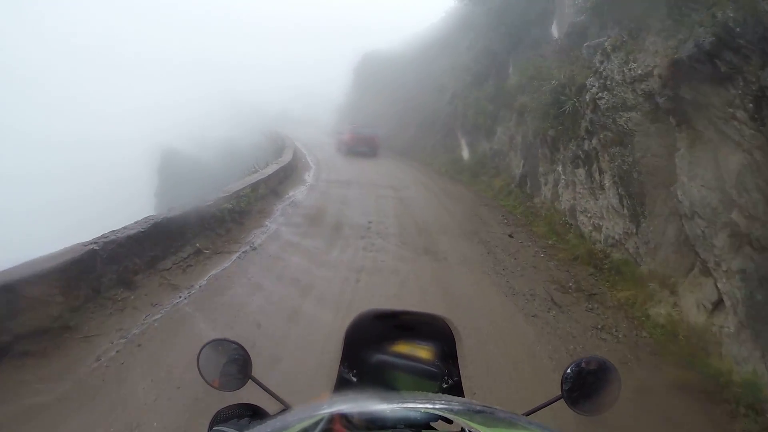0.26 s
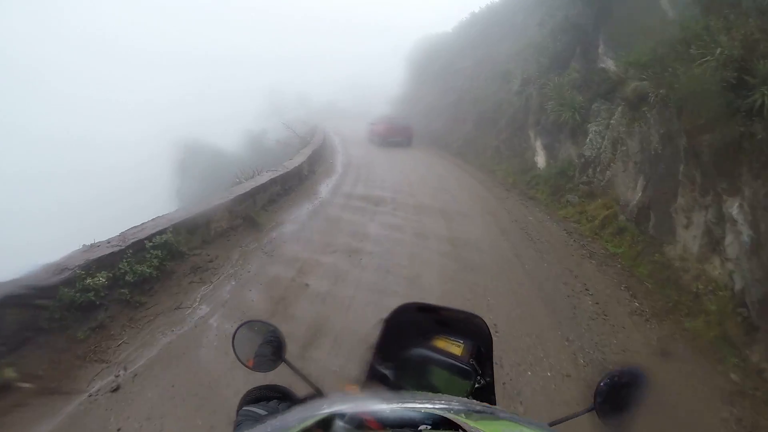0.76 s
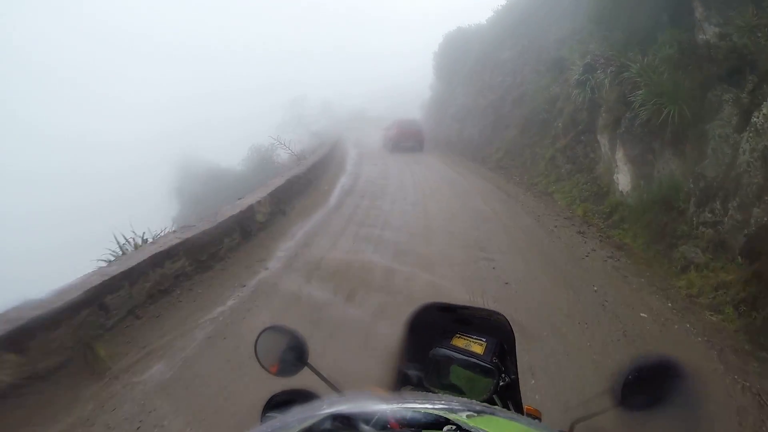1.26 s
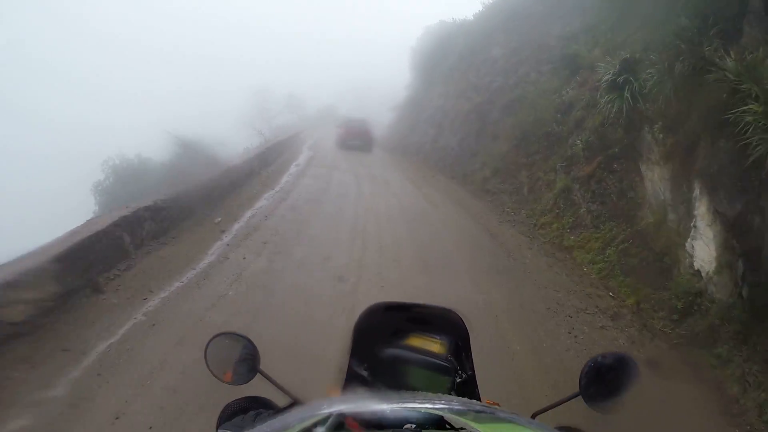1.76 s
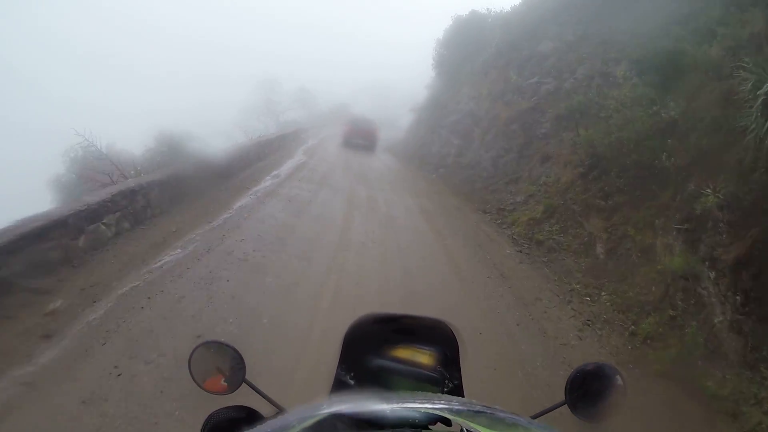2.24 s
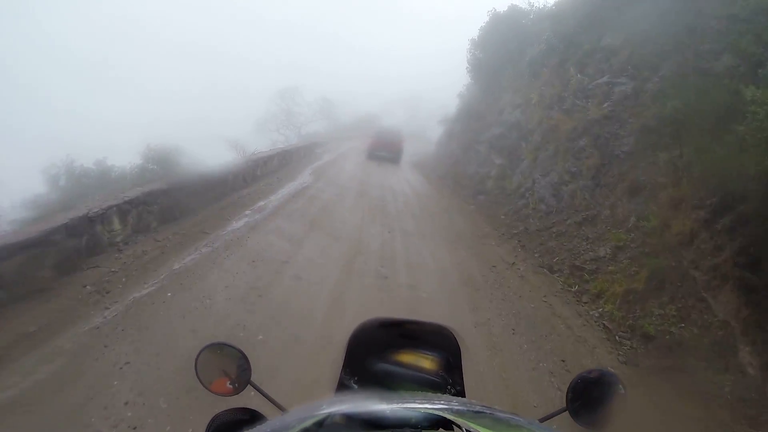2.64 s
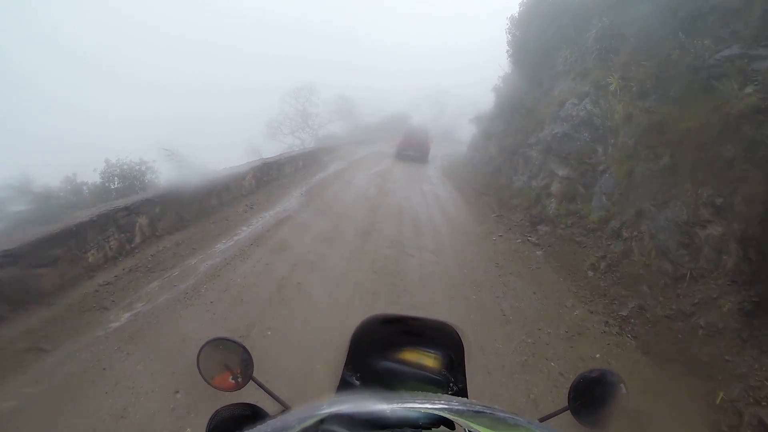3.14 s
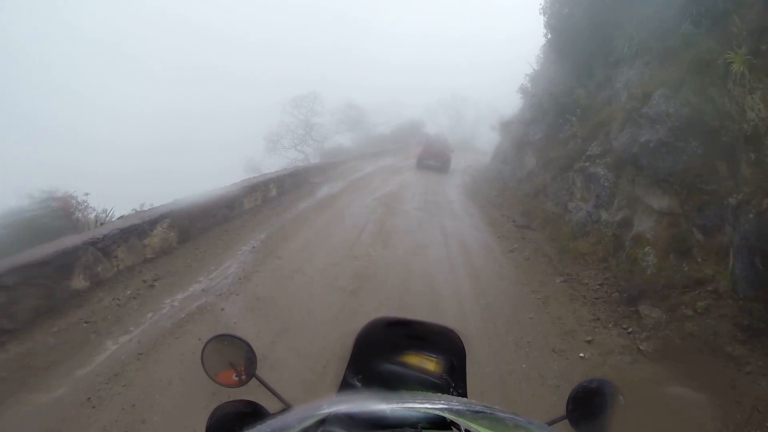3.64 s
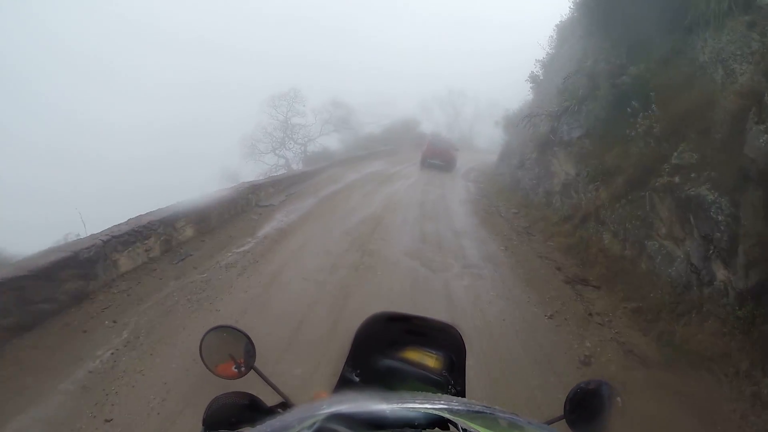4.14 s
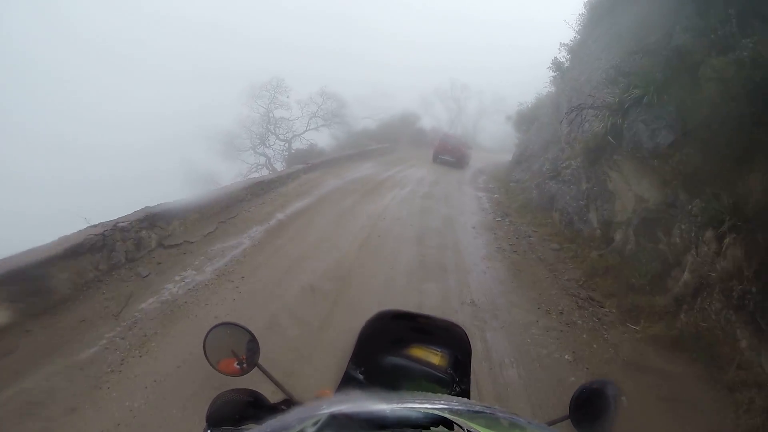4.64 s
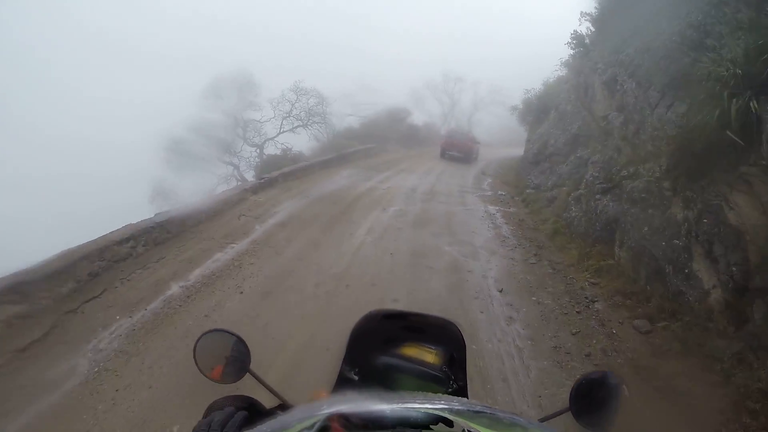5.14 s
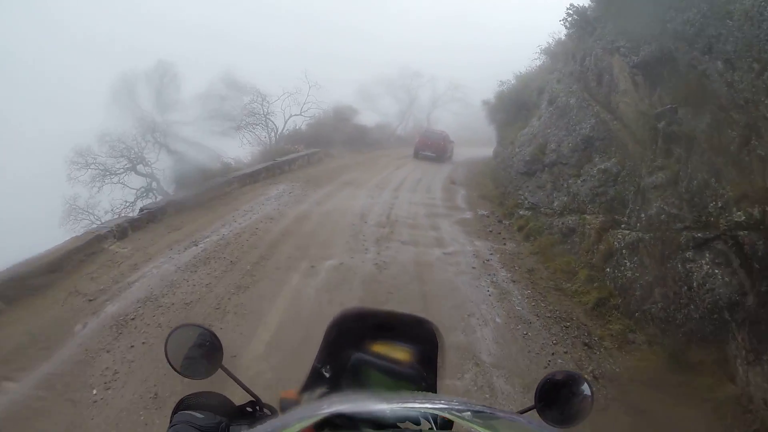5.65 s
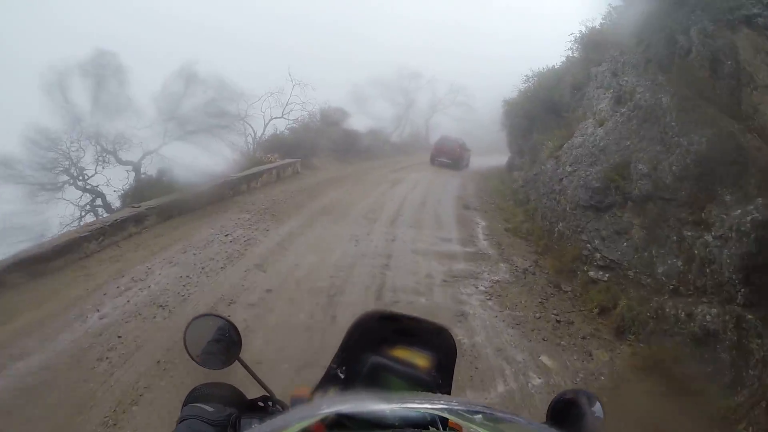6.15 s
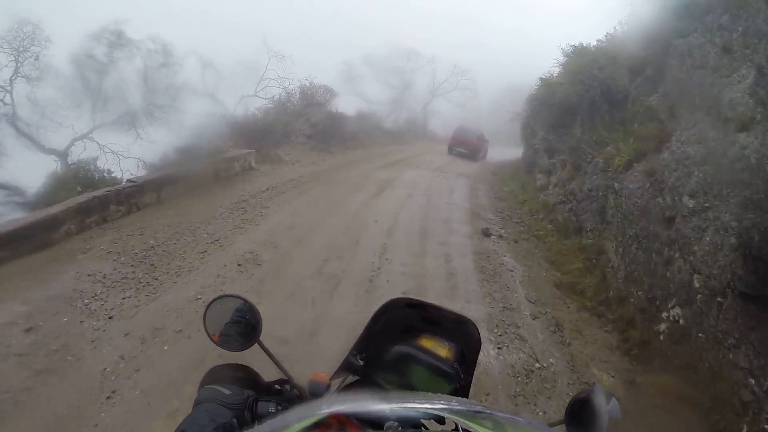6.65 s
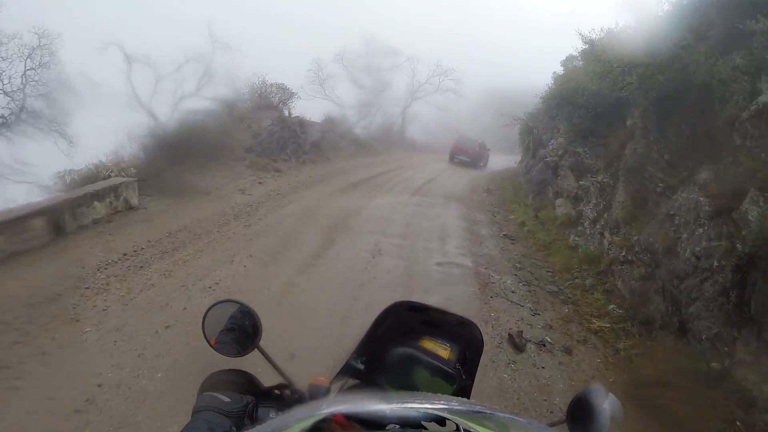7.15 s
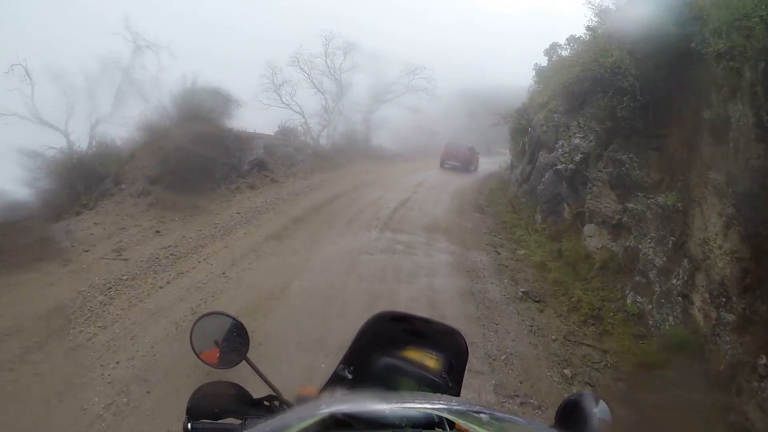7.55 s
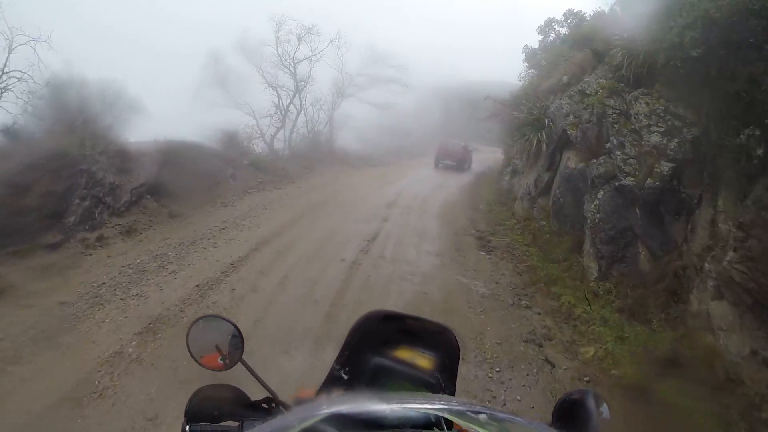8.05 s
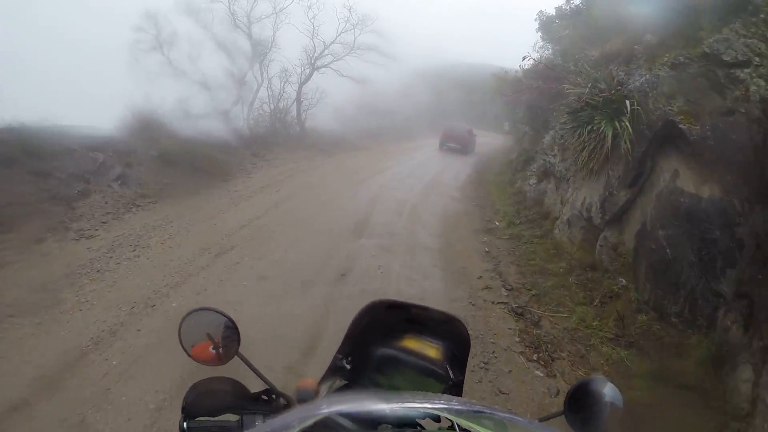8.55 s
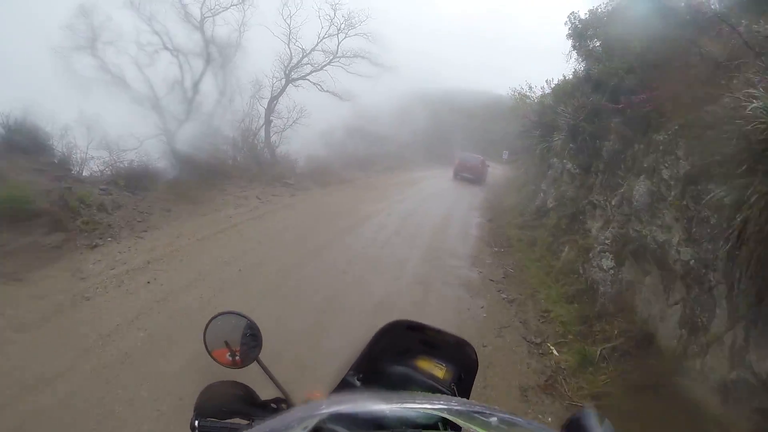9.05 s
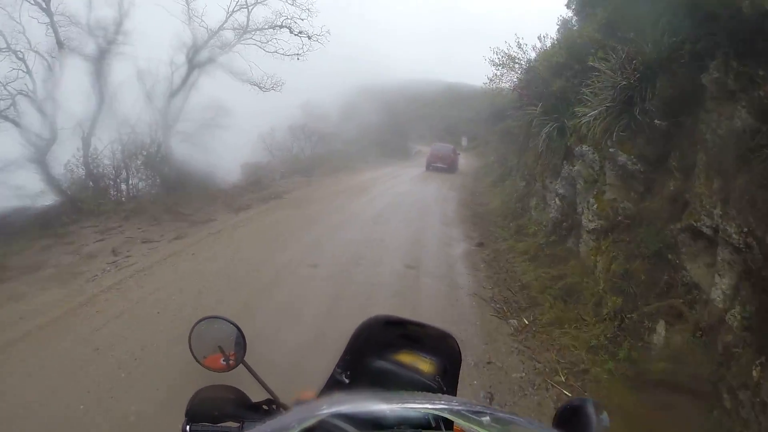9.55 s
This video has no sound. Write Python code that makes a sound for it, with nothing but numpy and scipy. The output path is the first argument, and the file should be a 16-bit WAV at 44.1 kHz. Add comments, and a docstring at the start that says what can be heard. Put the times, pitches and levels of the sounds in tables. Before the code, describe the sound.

A single-cylinder motorcycle climbs a wet gravel road, heard from a microphone on the rider. Heavy, low wind buffeting covers the thudding, rasping engine and a steady tyre hiss. Drops and grit tick lightly on the microphone case, and a few bumps give dull knocks. The engine eases slightly toward the middle, then pulls again, and a gust booms near the end.

```python
"""A single-cylinder motorcycle climbs a wet gravel road, heard from a cased camera on the rider.
From the start, periodic firing makes the engine thud and rasp, turbulence buffets the case and the
tyres hiss. Drops and grit soon tick on the case, exciting its modes; from about 1 s, bumps knock
the mount and gravel sprays. The engine eases off until 5 s, then pulls again; a gust booms at 8.5 s."""
import sys
import numpy as np
from scipy import signal
from scipy.fft import rfft, irfft, next_fast_len
from scipy.io import wavfile
from scipy.ndimage import uniform_filter1d, map_coordinates

SR = 44100
rng = np.random.default_rng(int(sys.argv[2]) if len(sys.argv) > 2 else 0)


def to_wav(s):
    """Save 16-bit WAV."""
    ch = np.atleast_2d(s).T  # columns
    pcm = np.round(np.clip(ch, -1, 1) * 32767)  # PCM
    wavfile.write(sys.argv[1], SR, pcm.astype(np.int16))


N = 432180

# engine speed: time_s, firing_hz
FIRING_RATE = [(0, 29.6), (.3, 28.8), (1.15, 29.8), (1.48, 28.1), (1.72, 28.9), (2.05, 28.1), (2.8, 27.1),
               (3.6, 25.7), (4.2, 24.9), (5, 24.7), (5.8, 25.5), (7.1, 27.4), (7.9, 28.1), (8.3, 27.7),
               (9.8, 28.8)]
# engine load, as the loudness of its rasp: time_s, load_db
LOAD = [(0.0, -51.8), (0.2, -49.5), (0.64, -54), (0.88, -49.5), (1.54, -52.5), (1.6, -55), (1.67, -47.5),
        (2.0, -51), (2.34, -46.5), (2.94, -58.5), (3.04, -45), (3.22, -60), (3.44, -51), (4.18, -58.0),
        (4.44, -54.5), (5.2, -56), (5.66, -48.5), (6.42, -51), (6.52, -48.5), (7.34, -50.5), (7.56, -46),
        (8.18, -47), (8.38, -44), (8.86, -51), (9.78, -46.5)]
# exhaust harmonics: firing_multiple, relative_db
EXHAUST_HARMONICS = [(2, -57), (3, -62.5), (4, -61.5), (5, -69.5), (6, -70), (7, -80), (8, -71.5),
                     (9, -71.5), (10, -72), (12, -77), (14, -75.5), (15, -74.5), (18, -71.5), (19, -76)]
# how strongly the exhaust carries forward: time_s, gain_db
EXHAUST_GAIN = [(0, 1), (1, 2.5), (1.8, 1), (3, -1), (4.5, -4), (6, -4), (7.5, -1), (9.8, -1)]
# gear tones: firing_multiple, relative_db
GEAR_TONES = [(41, -63), (68.6, -63)]
# resonances of the rasp: centre_hz, width_hz, gain_db
RASP_RESONANCES = [(1160, 130, -17), (1453, 120, 0), (2890, 170, -6.5)]
# envelope over those resonances: frequency_hz, gain_db
RASP_SPECTRUM = [(500, -50), (1150, .5), (3100, 1.5), (4500, -21), (9000, -25)]
# response of the metalwork: frequency_hz, gain_db
METAL_SPECTRUM = [(600, -23), (1000, -14.5), (1200, -2.5), (1700, 4), (2000, 1.5), (2600, 6.5), (3100, -3),
                  (3600, 1), (4100, -11.5), (6000, -22), (8000, -43)]
# rough patches that shake the metalwork: peak_s, rise_db, sigma_s
ROUGH_PATCHES = [(.24, 5, 0.026), (1.06, 3.5, 0.13), (1.77, 2, .06), (2.44, 2, 0.05), (4.583, 5, 0.023),
                 (5.6, 2, .05), (6.2, 0.5, .15), (6.827, 3.5, .05), (7.65, 2, 0.26), (8.484, 6, 0.12),
                 (8.93, 4, 0.053)]
# eddies behind the windscreen: frequency_hz, gain_db
EDDY_SPECTRUM = [(5, -24), (12, -13), (22, -17), (28, -11), (34, 0), (41, -4), (49, 1), (58, -5), (68, -18),
                 (90, -30), (150, -40), (400, -70)]
# strength of their buffeting: time_s, level_db
BUFFET_LEVEL = [(0.0, -33.5), (0.38, -33.5), (0.84, -47.5), (1.02, -30.5), (1.42, -40.5), (1.6, -33),
                (1.86, -39), (2.54, -31.3), (2.9, -45.5), (3.06, -35.5), (4.04, -36.6), (4.26, -31),
                (4.38, -42.5), (4.54, -31), (4.92, -41), (5.82, -35), (7.06, -38), (7.28, -33.5),
                (7.64, -39), (7.88, -31.0), (8.16, -39), (8.32, -30), (8.58, -36.1), (9.06, -28),
                (9.44, -36), (9.78, -36.3)]
# passing air: frequency_hz, gain_db
RUSH_SPECTRUM = [(30, 6), (100, 3), (180, -1), (300, -3), (400, -5), (650, -8), (950, -8), (1500, -17),
                 (4000, -39), (16000, -60)]
# hollows sounded by the air: centre_hz, width_hz, gain_db
CAVITY_RESONANCES = [(145.3, 8, 1), (256, 57, -14.5), (513.4, 37, -8.5), (1106, 49, -15.5)]
# tread on wet grit: frequency_hz, gain_db
TYRE_SPECTRUM = [(800, -9.5), (1700, 4.5), (3300, -2.5), (4200, -5), (4800, -2.5), (5700, 1), (6400, 2),
                 (7050, -3.5), (7600, -17.5), (9400, -14), (10900, -30.5), (13000, -19), (15500, -40)]
# tyre hiss, following the wetness of the road: time_s, level_db
HISS_LEVEL = [(0, -51), (1.4, -52.5), (2.9, -54), (4.4, -55), (6.2, -54.5), (6.8, -53), (7.6, -54),
              (8.5, -53), (9.8, -54)]
# case resonances that colour the hiss: centre_hz, width_hz, gain_db
CASE_RESONANCES = [(5200, 220, 0), (8350, 400, -14), (10150, 400, -11)]
# drops and grit on the case: start_s, wall_db, lens_db, rim_db, pitch_ratio, crack_share
IMPACTS = [(.1557, -31, -46, -55, 1.26, .6), (.5752, -31, -24.5, -47, 0.99, 0.16),
           (1.1917, -47, -40.5, -53, 1, 0.2), (2.0326, -34, -47, -51, 1.08, .3),
           (2.5366, -49, -40, -60, 0.97, 0.1), (3.6491, -21, -21.5, -29.5, 1.01, 0.2),
           (3.7943, -38, -45, -59, 0.67, .8), (4.1579, -52, -42, -55, 0.98, 0.1),
           (4.2146, -46, -42, -57, 0.99, 0.5), (5.1823, -43, -35.5, -54, 0.99, 0.15),
           (6.7559, -30, -27.5, -44, 1.05, 0.6), (7.0993, -31.5, -29.5, -45, 1.2, 0.8),
           (7.1362, -30.5, -33, -48, 1, 0.7), (7.7047, -23, -37, -48, 1.13, 0.72),
           (8.6789, -40, -41, -63, 1.05, 0.2), (8.6991, -44, -40, -60, 1, 0.1),
           (8.7363, -36.5, -32.5, -41, 1.07, 0.5), (9.6368, -34, -35, -39.5, 1.12, 0.4)]
# case modes (four wall, three lens, four rim): pitch_hz, relative_db, t60_s
CASE_MODES = [(1520, -7, .008), (2200, -1, .02), (2480, -2, .014), (3350, -3, .005), (4650, -11, .004),
              (5280, 0, .008), (6500, -6, .004), (8450, -3, .005), (10100, -3, .004), (11900, 0, .003),
              (14800, -10, .003)]
# crack bands of wall, lens and rim: low_hz, high_hz
CRACK_BANDS = [(1300, 3600), (4100, 7000), (7500, 12000)]
# bumps in the road: start_s, gain_db
ROAD_BUMPS = [(.9, -37.5), (1.255, -53), (1.675, -45), (5.721, -44)]
# modes of the camera mount: pitch_hz, relative_db, t60_s
MOUNT_MODES = [(88, 5, .21), (108, 7, .095), (150, -2, .3), (178, -12, .1)]
# wet gravel thrown by the tyres: peak_s, level_db, sigma_s, centre_hz
GRAVEL_SPRAYS = [(.951, -44, .005, 2300), (1.151, -42.5, .006, 2400), (1.986, -38, .003, 2050),
                 (5.335, -42.5, 0.0098, 1850), (5.693, -45, 0.0067, 2400), (6.848, -47, 0.0055, 1800),
                 (8.36, -49.5, 0.011, 4700), (8.456, -48, .003, 2900), (8.737, -35, 0.0023, 1570)]
# bands of a gust on the case: peak_s, level_db, sigma_s, centre_hz
GUST_BANDS = [(8.55, -39.5, 0.13, 14), (8.55, -58.5, 0.16, 255)]

CRUISE_FIRING_HZ, CRUISE_LOAD_DB = 27.5, -50
CLATTER_DB, RUSH_DB = -51.5, -53.5  # at cruise
BAND_LIMIT_HZ = 15600


def amp(db):
    return 10 ** (np.asarray(db) / 20)


def unit(x):
    """x at rms 1."""
    return x / np.sqrt(np.mean(x ** 2) + 1e-20)


def curve(rows):
    """Linear interpolation of (time_s, value) rows at every sample."""
    return np.interp(np.arange(N) / SR, *np.transpose(rows))


def wobble(rate_hz):
    """A smooth random curve through rate_hz knots a second."""
    knots = rng.standard_normal(int(N * rate_hz / SR) + 4)
    return map_coordinates(knots, [np.arange(N) * rate_hz / SR])


def bell(peak_s, sigma_s):
    """A Gaussian envelope."""
    return np.exp(-.5 * ((np.arange(N) / SR - peak_s) / sigma_s) ** 2)


def noise():
    return rng.standard_normal(N)


def filtered(x, response):
    """x through a complex frequency response."""
    size = next_fast_len(N + SR // 2)
    return irfft(rfft(x, size) * response(np.fft.rfftfreq(size, 1 / SR)), size)[:N]


def coloured(x, spectrum):
    """x under a spectral envelope, at rms 1."""
    hz, db = np.transpose(spectrum)
    return unit(filtered(x, lambda f: amp(np.interp(np.log(f + 1), np.log(hz), db))))


def resonant(x, peaks):
    """x through parallel second-order resonators, at rms 1."""
    return unit(filtered(x, lambda f: sum(
        amp(db) * 1j * f * width / (hz * hz - f * f + 1j * f * width) for hz, width, db in peaks)))


def add(track, start_s, sound):
    part = track[max(round(start_s * SR), 0):][:len(sound)]
    part += sound[:len(part)]


def crunch(rate_hz, spread_db):
    """Shot noise: random impulses of unequal size, at rms 1."""
    return unit((rng.random(N) < rate_hz / SR) * noise() * amp(spread_db * np.clip(noise(), -2, 2)))


def swells(rows, octaves):
    """Noise bursts, Gaussian in time and in log frequency."""
    track = np.zeros(N)
    for peak_s, db, sigma_s, hz in rows:
        band = filtered(noise(), lambda f: np.exp(-.5 * (np.log2((f + 1) / hz) / octaves) ** 2))
        track += amp(db) * bell(peak_s, sigma_s) * unit(band)
    return track


def effort_db(db_per_hz, load_slope):
    """Gain over the cruising level, linear in firing rate and load."""
    speed_db = db_per_hz * (curve(FIRING_RATE) - CRUISE_FIRING_HZ)
    return speed_db + load_slope * (curve(LOAD) - CRUISE_LOAD_DB)


def exhaust(phase):
    """Periodic pressure pulses radiate harmonics of the firing rate."""
    note = sum(amp(db + 2.55 * wobble(6)) * np.sqrt(2) * np.sin(k * phase + 2 * np.pi * rng.random())
               for k, db in EXHAUST_HARMONICS)
    return amp(curve(EXHAUST_GAIN)) * note


def gear_whine(phase):
    """Meshing teeth give unsteady tones that follow engine speed, louder as the load eases."""
    whine = sum(amp(db + 3.2 * wobble(9)) * np.sin(k * phase + 1.57 * wobble(70))
                for k, db in GEAR_TONES)
    return whine * amp(-.4 * (curve(LOAD) + 67))


def strikes(cycle, count, scatter_db=2.5):
    """Phase-locked impacts: valves, chain and piston hit at set crank angles with varying force."""
    strike_cycles = np.arange(int(cycle[-1]) + 1)[:, None] + rng.random(count)
    samples = np.interp(strike_cycles, cycle, np.arange(N), right=N).astype(int)
    force = rng.choice([-1, 1], count) * amp(scatter_db * rng.standard_normal(samples.shape))
    return unit(np.bincount(samples.ravel(), force.ravel(), N + 1)[:N])


def rasp(cycle, surge, jolts):
    """Source and filter: pulsing gas noise and impacts drive resonances, louder under load."""
    flutter = amp(.82 * jolts + 1.4 * wobble(24))
    gas = surge * flutter * (noise() + .64 * strikes(cycle, count=44))
    return amp(curve(LOAD) + 3) * coloured(resonant(gas, RASP_RESONANCES), RASP_SPECTRUM)


def clatter(cycle, surge, jolts):
    """Forced vibration: cyclic and random impacts shake the metalwork, more on rough road."""
    rattle = noise() + .41 * strikes(cycle, count=30) + .57 * crunch(rate_hz=450, spread_db=2.5)
    flutter = amp(.5 * jolts + .81 * wobble(20))
    rough_db = sum(db * bell(peak_s, sigma_s) for peak_s, db, sigma_s in ROUGH_PATCHES)
    level_db = CLATTER_DB + effort_db(db_per_hz=.66, load_slope=.2) + rough_db
    return amp(level_db) * coloured(surge * flutter * rattle, METAL_SPECTRUM)


def engine():
    """The four-stroke cycle, one firing in two turns, times all four engine sounds."""
    cycle = np.cumsum(curve(FIRING_RATE)) / SR
    phase = 2 * np.pi * cycle
    tones = exhaust(phase) + gear_whine(phase)
    surge = amp(.2 * np.cos(phase) + .55 * np.cos(2 * phase))  # piston strokes modulate the noise
    jolts = wobble(13)  # uneven road makes rasp and clatter flare together
    return tones + rasp(cycle, surge, jolts) + clatter(cycle, surge, jolts)


def buffeting():
    """Vortex shedding off the windscreen shakes the case; the heavy mount acts as a low-pass."""
    eddies = coloured(noise(), EDDY_SPECTRUM)
    running_rms = np.sqrt(np.abs(uniform_filter1d(eddies ** 2, size=5000)))
    evened = unit(eddies / (running_rms + .39))
    shaking = amp(curve(BUFFET_LEVEL) - .9 + 2.03 * wobble(10)) * evened
    return filtered(shaking, lambda hz: 1 / np.sqrt(1 + (hz / 66) ** 14))


def air_rush():
    """Turbulent flow gives broadband noise and excites cavity resonances, growing with speed."""
    rush = coloured(noise(), RUSH_SPECTRUM) + amp(-7) * resonant(noise(), CAVITY_RESONANCES)
    return amp(RUSH_DB + effort_db(db_per_hz=.14, load_slope=.18) + .64 * wobble(12)) * rush


def tyre_hiss():
    """Many tiny impacts of wet grit merge into a hiss, with faint resonance of the case."""
    grit = noise() + .34 * crunch(rate_hz=1500, spread_db=4.5)
    ringing = amp(-10) * resonant(noise(), CASE_RESONANCES)
    return amp(curve(HISS_LEVEL) + .42 * wobble(14)) * (coloured(grit, TYRE_SPECTRUM) + ringing)


def drops():
    """Impulse response: each impact cracks and rings wall, lens and rim according to where it lands."""
    track, t = np.zeros(N), np.arange(SR // 30) / SR
    parts = CASE_MODES[:4], CASE_MODES[4:7], CASE_MODES[7:]
    bands = [signal.butter(3, band, "band", fs=SR, output="sos") for band in CRACK_BANDS]
    drizzle = [(when * N / SR, -54 + 9 * wall, -56 + 9 * lens, -63 + 8 * rim, 1, .5)
               for when, wall, lens, rim in rng.random((36, 4))]
    for start_s, *levels_db, pitch_ratio, crack_share in list(IMPACTS) + drizzle:
        for modes, band, part_db in zip(parts, bands, levels_db):
            ring = sum((-1) ** k * amp(db + 1.4 * rng.standard_normal() - 60 * t / t60)
                       * np.sin(2 * np.pi * hz * pitch_ratio * t)
                       for k, (hz, db, t60) in enumerate(modes))
            ring *= 1 - np.exp(-t / .00012)
            # a flat impact is over almost at once
            crack = signal.sosfilt(band, rng.standard_normal(len(t)) * amp(-60 * t / .0023))
            hit = np.sqrt(1 - crack_share) * unit(ring) + np.sqrt(crack_share) * unit(crack)
            add(track, start_s, amp(part_db + 17.5) * hit / np.linalg.norm(hit))
    # the small stiff case radiates no bass
    return signal.sosfilt(signal.butter(3, 1000, "high", fs=SR, output="sos"), track)


def bumps():
    """Damped free vibration: a jolt rings the low modes of the mount as a dull knock."""
    track, t = np.zeros(N), np.arange(SR // 4) / SR
    knock = sum(amp(db - 60 * t / t60) * np.sin(2 * np.pi * hz * t) for hz, db, t60 in MOUNT_MODES)
    knock *= 1 - np.exp(-t / .0035)
    for start_s, db in ROAD_BUMPS:
        add(track, start_s, amp(db) * knock)
    return track


def gravel_sprays():
    """Thrown wet gravel makes dense impacts that fuse into short bursts of band noise."""
    return swells(GRAVEL_SPRAYS, octaves=.47)


def gust():
    """A swell of turbulent pressure booms on the case."""
    return swells(GUST_BANDS, octaves=.49)


def scene():
    """Superposition: the sources ride along with the camera and sum to one channel."""
    return (engine() + buffeting() + air_rush() + gust()
            + tyre_hiss() + gravel_sprays() + drops() + bumps())[None]


def record(dry):
    """An ideal low-pass: the camera keeps nothing above its band limit."""
    return filtered(dry[0], lambda hz: hz < BAND_LIMIT_HZ)[None]


dry = scene()
out = record(dry)
to_wav(out)
```